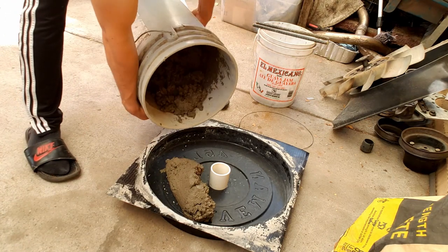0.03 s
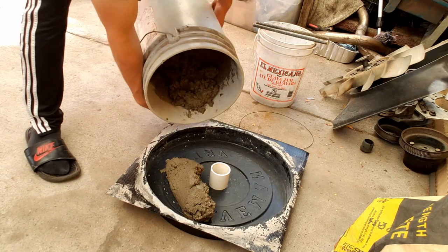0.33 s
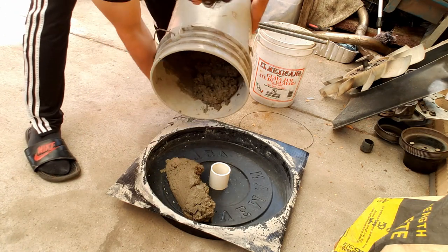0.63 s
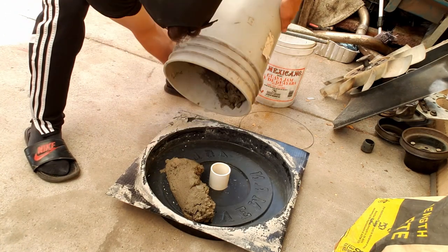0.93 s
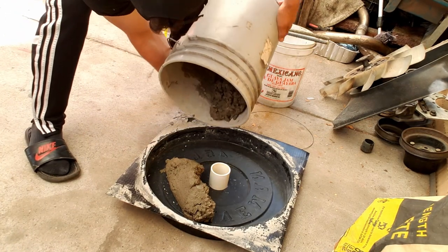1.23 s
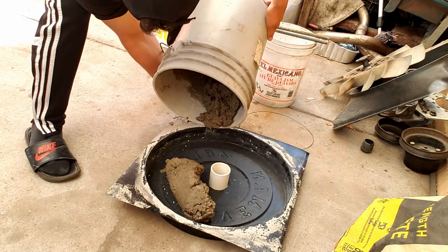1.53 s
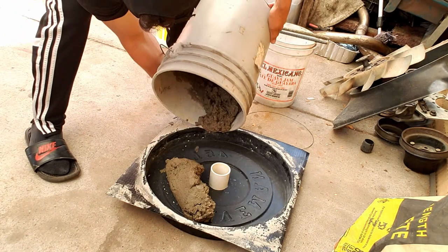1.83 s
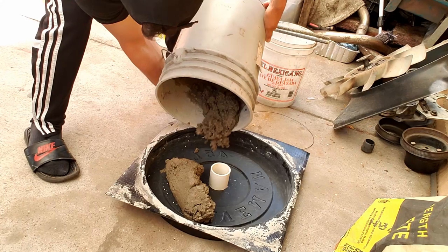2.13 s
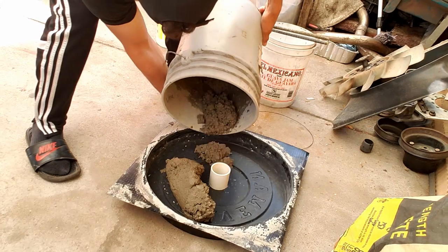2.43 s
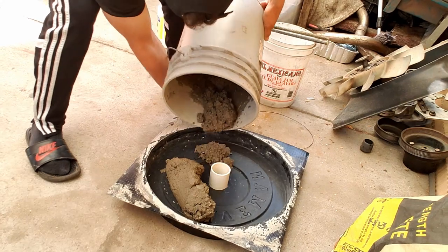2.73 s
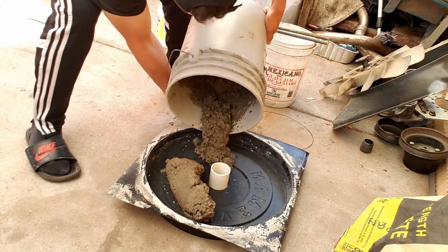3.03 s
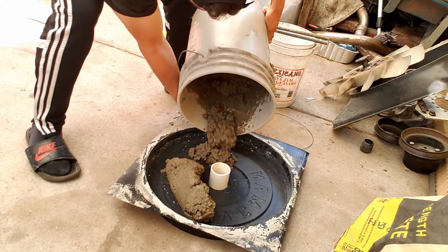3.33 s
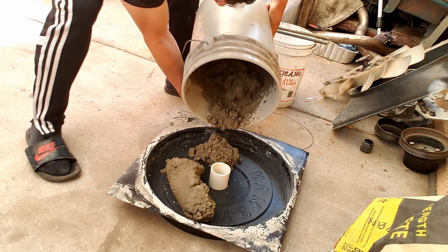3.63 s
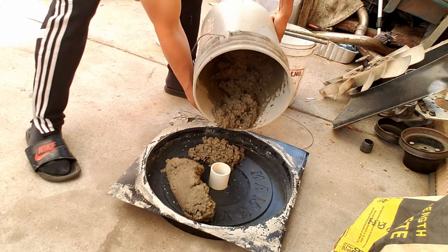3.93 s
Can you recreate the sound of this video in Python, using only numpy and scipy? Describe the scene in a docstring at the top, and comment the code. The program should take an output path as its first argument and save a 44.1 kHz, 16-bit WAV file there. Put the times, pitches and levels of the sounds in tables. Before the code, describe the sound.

Wet, gritty concrete slides from a plastic bucket and splats in clumps into a plastic mold.

```python
"""Gritty wet concrete is shaken out of a plastic bucket into a plastic mold on a hard floor.
The mix hisses along the bucket wall; clumps splat, squeeze out air pockets and crackle wetly.
Pebbles and grit tick, and twice the plastic takes a hard knock and rings.
A short room tail follows; puffs of air rumble on the microphone over a low background."""
import sys
import numpy as np
from scipy import signal
from scipy.fft import rfft, irfft
from scipy.io import wavfile
from scipy.ndimage import uniform_filter1d

SR = 44100
rng = np.random.default_rng(int(sys.argv[2]) if len(sys.argv) > 2 else 0)


def store_wav(level_fs):
    """Save 16-bit WAV to argv[1]."""
    pcm = np.round(np.clip(np.atleast_2d(level_fs), -1, 1) * 32767)
    wavfile.write(sys.argv[1], SR, pcm.T.astype(np.int16))


N = 176400
SIDES = np.array([[1], [-1]])  # left, right
# grit spray spectrum: (frequency [Hz], level [dB])
GRIT_SPECTRUM = [(1500, -58), (3000, -1), (4300, 1.5), (6500, -0.5), (10000, -5), (16000, -13.5)]


def slide(grains_per_s=14000, flutter_db=1.0, flutter_s=0.018):
    """Sand rubs along the bucket wall in surges, fluttering slightly."""
    # (time [s], level [dB])
    surges = [(0, -45.5), (.17, -61), (.33, -72), (.43, -79), (.48, -59.5), (.55, -64), (.63, -60.5),
              (.73, -63), (.85, -52.5), (.96, -49.5), (1.01, -43), (1.09, -54), (1.15, -68.5),
              (1.21, -67.5), (1.27, -47.5), (1.34, -43.5), (1.57, -42), (1.7, -49), (1.78, -56.5),
              (1.87, -62.5), (1.97, -44), (2.03, -40), (2.13, -43), (2.24, -40), (2.45, -42), (2.52, -45.5),
              (2.58, -56), (2.73, -67.5), (2.78, -52), (2.83, -39), (2.87, -43.5), (2.94, -57),
              (3.0, -46.5), (3.07, -43.5), (3.12, -50.5), (3.19, -43.5), (3.3, -49.5), (3.36, -53.5),
              (3.44, -46), (3.53, -53), (3.58, -48.5), (3.72, -42), (3.79, -35.5), (3.85, -42), (3.92, -49),
              (4.0, -41.5)]
    # (frequency [Hz], level [dB])
    spectrum = [(100, -43), (300, -14), (600, -8.5), (1000, -5.5), (1500, 3), (2200, -0.5), (3200, -0.5),
                (5000, -2.5), (8000, -5), (16000, -11.5)]
    level_db = over_time(surges) + flutter_db * wobble(flutter_s, N)
    hiss = colour(grains(N, grains_per_s, spread_db=2.5), spectrum)
    return from_db(level_db) * rms_one(hiss)


def clumps():
    """Each clump thuds on the mold, smacks wetly and scatters grit."""
    # (time [s], rise [s], decay [s], thud [dB], smack [dB], grit [dB])
    landings = [ (2.247, 0.00085, 0.012, -29.5, -26.5, -27.5), (2.268, 0.00067, 0.0067, -23.5, -31, -44),
                (2.2774, 0.0017, 0.01, -28.5, -21.5, -26), (2.291, 0.0017, 0.014, -25.5, -23.5, -29),
                (2.311, 0.00071, 0.0071, -29, -29, -46), (2.319, 0.0037, 0.0088, -17.5, -21.5, -25),
                (2.3294, 0.00031, 0.0021, -12, -14.5, -19), (2.342, .001, 0.0044, -26.5, -40, -41),
                (2.3745, 0.0058, 0.0045, -22, -26, -24.5), (2.429, 0.00055, 0.0025, -37, -29, -27.5),
                (2.4594, .001, 0.0043, -27, -31, -34), (2.477, 0.0056, 0.012, -32, -28.5, -29),
                (2.602, 0.003, 0.0034, -49.5, -41, -72), (2.957, 0.00033, 0.0044, -37, -34, -33),
                (3.013, 0.0057, .008, -38, -46, -41), (3.019, 0.0026, 0.003, -25.5, -26, -27.5),
                (3.045, 0.0033, 0.018, -43, -36.5, -55), (3.123, 0.0011, .004, -39, -39, -48),
                (3.141, 0.0011, 0.0034, -26, -25.5, -20), (3.161, 0.0025, .015, -40, -44, -42),
                (3.243, 0.00063, 0.0026, -34, -27, -34), (3.260, 0.00041, 0.0052, -30.5, -32.5, -50),
                (3.293, 0.0006, 0.0049, -33.5, -37.5, -33), (3.315, .002, 0.0068, -41.5, -40.5, -47),
                (3.377, 0.019, 0.012, -44, -30, -39), (3.419, 0.0037, 0.0027, -55, -33.5, -38),
                (3.443, 0.0017, 0.013, -52, -38.5, -43.5), (3.547, 0.0024, 0.011, -42, -39.5, -41),
                (3.586, 0.00084, 0.0022, -58, -48, -32.5), (3.603, 0.0024, 0.005, -33.5, -31.5, -53),
                (3.611, 0.00066, 0.0079, -38.5, -30, -56), (3.646, 0.0024, 0.014, -38.5, -37, -44),
                (3.688, 0.001, 0.014, -33.5, -34, -33.5), (3.738, 0.011, 0.007, -37.5, -24.5, -30),
                (3.762, 0.0013, 0.023, -39.5, -27.5, -39), (3.875, 0.0015, 0.0056, -26.5, -35, -50),
                (3.895, 0.0011, 0.0045, -29, -35, -47), (3.926, 0.0016, 0.0063, -27.5, -30, -27),
                (3.974, 0.00087, 0.0029, -41, -33, -37)]
    # (frequency [Hz], level [dB])
    thud_spectrum = [(60, -18.5), (200, -19.5), (360, -35.5), (550, -14), (850, -1.5), (1100, -4.5),
                     (1500, -4.5), (3000, -54.5)]
    # (frequency [Hz], level [dB])
    smack_spectrum = [(500, -18.5), (950, -19.5), (1400, -2), (2000, -2), (2800, -2.5), (4000, -9.5),
                      (6000, -16.5), (12000, -17)]
    out = np.zeros((2, N))
    for time_s, rise_s, decay_s, thud_db, smack_db, grit_db in landings:
        add(out, time_s, from_db(thud_db) * burst(rise_s, decay_s, thud_spectrum))
        add(out, time_s, from_db(smack_db) * burst(rise_s, decay_s, smack_spectrum))
        add(out, time_s, from_db(grit_db) * burst(rise_s, decay_s, GRIT_SPECTRUM))
    return out


def air_pockets(rise_s=0.00033, glide_per_s=2.4, size=4096):
    """Air squeezed from the landing mix rings for a few unsteady cycles, rising a little in pitch."""
    # (time [s], pitch [Hz], level [dB], decay [s])
    pops = [(2.279, 1205, -22.5, 0.0089), (2.292, 1167, -18.5, 0.0093), (2.322, 1810, -23, 0.0093),
            (2.376, 1403, -27, 0.0056), (2.4299, 1420, -30.5, 0.0032), (2.604, 2000, -43, .005),
            (3.020, 2565, -21.5, 0.0026), (3.143, 1550, -20, 0.003), (3.147, 400, -43, .016),
            (3.163, 675, -33.5, 0.0061), (3.243, 2127, -33.5, 0.0077), (3.261, 3400, -38, 0.0065),
            (3.293, 3380, -35.5, 0.0047), (3.316, 717, -38, 0.0067), (3.328, 574, -50, 0.0063),
            (3.384, 1593, -38, 0.018), (3.422, 1700, -32.5, 0.0042), (3.612, 910, -32.5, 0.0059),
            (3.648, 1265, -28, 0.0035), (3.742, 1533, -25, 0.0069), (3.928, 1414, -23, 0.0039)]
    out, t = np.zeros((2, N)), np.arange(size) / SR
    for time_s, hz, db, decay_s in pops:
        phase = 2 * np.pi * hz * (t + glide_per_s * t ** 2 / 2) + wobble(2 / hz, size)
        envelope = np.minimum(t / rise_s, 1) * np.exp(-t / decay_s)
        add(out, time_s, from_db(db) * np.sqrt(2) * envelope * np.sin(phase))
    return out


def crackle(snaps_per_s=420, spread_db=2, decay_cycles=3.2, pitches=24, size=1024):
    """Water films snap at random as the mix tears and settles, each ringing at its own pitch."""
    # (time [s], level [dB])
    levels = [(0, -89), (1.1, -84), (1.35, -58), (1.7, -60), (1.85, -70), (2.05, -61), (2.23, -51),
              (2.32, -39), (2.48, -48), (2.62, -69), (2.75, -77), (2.85, -51), (2.97, -71), (3.05, -44),
              (3.11, -62), (3.2, -58), (3.3, -49), (3.36, -58), (3.41, -43.5), (3.52, -58), (3.62, -44.5),
              (3.72, -42), (3.8, -44.5), (3.9, -42.5), (4.0, -50)]
    # (frequency [Hz], level [dB])
    spectrum = [(700, -7), (1500, -2.5), (3000, -5.5), (6500, -6)]
    t = np.arange(size) / SR
    pitch_index = rng.integers(0, pitches, N)
    onsets = rng.random(N) < snaps_per_s / SR
    snaps = onsets * from_db(spread_db * np.minimum(rng.exponential(1, N), 3.5))
    out = 0
    for k, hz in enumerate(np.geomspace(spectrum[0][0], spectrum[-1][0], pitches)):
        ring = rms_one(np.sin(2 * np.pi * hz * t) * np.exp(-t * hz / decay_cycles))
        out = out + from_db(at_hz(spectrum, hz)) * convolve(snaps * (pitch_index == k), ring)
    return from_db(over_time(levels)) * rms_one(out)


def knocks(low_cut_hz=480):
    """A gritty crack sets the plastic ringing; the thin wall flexes with a dull bump."""
    # (time [s], ring [dB], pitch [ratio], t60 [ratio], crack [dB], flex [dB], left-right [dB])
    strikes = [(1.9074, -16.5, 0.99, 0.75, -26, -35.5, 2.5), (1.9177, -28.5, 0.98, 1, -35, -36, -4),
               (3.8524, -14.5, 0.91, 0.49, -28, -49, 1)]
    # (frequency [Hz], level [dB], t60 [s])
    plastic_modes = [(653, -16, 0.062), (871, -0.5, 0.084), (979, -4, .12), (1026, -6.5, 0.068),
                     (1215, 2.5, 0.043), (1503, -4.5, 0.11), (1528, -2, 0.047), (2140, 7.5, 0.0077),
                     (2480, -7, 0.058), (2780, -4, 0.015)]
    # (frequency [Hz], level [dB])
    flex_spectrum = [(100, -16), (250, -6.5), (480, -4.5), (650, 0), (1000, -20), (3000, -50)]
    out, t = np.zeros((2, N)), np.arange(SR // 2) / SR
    low_cut = signal.butter(2, low_cut_hz, "high", fs=SR, output="sos")
    for time_s, ring_db, pitch_ratio, t60_ratio, crack_db, flex_db, pan_db in strikes:
        ring = np.zeros_like(t)
        for k, (hz, db, t60_s) in enumerate(plastic_modes):
            envelope = from_db(db - 60 * t / (t60_s * t60_ratio))
            ring += (-1) ** k * envelope * np.sin(2 * np.pi * hz * pitch_ratio * t)
        crack = burst(rise_s=0.00019, decay_s=0.0075, spectrum=GRIT_SPECTRUM)
        flex = burst(rise_s=0.001, decay_s=0.021, spectrum=flex_spectrum)
        add(out, time_s, panned_gain(ring_db, pan_db) * signal.sosfilt(low_cut, ring))
        add(out, time_s, from_db(crack_db) * crack + from_db(flex_db) * flex)
    return out


def pebbles(rise_s=0.00027):
    """Small stones tick against the inside of the bucket."""
    # (time [s], level [dB], decay [s])
    hits = [(.0082, -24, 0.0036), (.016, -43, 0.024), (0.555, -36.5, 0.0022), (0.595, -40, 0.0058),
            (0.627, -32.5, 0.0022), (0.651, -41, 0.0036), (1.005, -40, 0.0044), (1.084, -44, 0.0036),
            (1.685, -36, 0.006), (1.702, -39.5, 0.0029), (1.853, -47, 0.005), (2.062, -36, 0.0045)]
    # (frequency [Hz], level [dB])
    spectrum = [(300, -20), (900, -9), (1250, -5.5), (1560, 7.5), (1850, -3.5), (2300, -2), (3000, -8),
                (4000, -14.5), (6000, -16.5), (10000, -28.5), (16000, -25)]
    out = np.zeros((2, N))
    for time_s, db, decay_s in hits:
        add(out, time_s, from_db(db) * burst(rise_s, decay_s, spectrum))
    return out


def falling_grit(rise_s=0.0005, decay_s=0.0012):
    """Single grains land with short, bright ticks."""
    # (time [s], level [dB])
    ticks = [(.263, -50), (0.355, -53.5), (.498, -64), (.627, -64), (.682, -55), (2.428, -38), (3.072, -34),
             (3.294, -36), (3.841, -48), (3.926, -46), (3.974, -32)]
    # (frequency [Hz], level [dB])
    spectrum = [(1000, -25), (3000, -32), (6000, -5), (9000, 4), (16000, -4)]
    out = np.zeros((2, N))
    for time_s, db in ticks:
        add(out, time_s, from_db(db) * burst(rise_s, decay_s, spectrum))
    return out


def air_puffs():
    """Soft puffs of air rumble on the microphone."""
    # (time [s], Gaussian width [s], level [dB], left-right [dB])
    puffs = [(.04, 0.023, -45, 17), (0.628, 0.026, -33, 10), (.765, 0.0089, -27, -13),
             (1.038, 0.024, -32.5, 15.5), (1.209, 0.021, -31.5, 18.5), (1.841, 0.058, -33, 0.5),
             (2.1, 0.017, -34, 3.5), (3.05, 0.034, -39, 6)]
    # (frequency [Hz], level [dB])
    spectrum = [(15, -46), (35, -5.5), (58, 1.5), (95, -6), (150, -19), (300, -46.5), (1000, -70)]
    out, t = np.zeros((2, N)), np.arange(N) / SR
    rumble = colour(rng.standard_normal((2, N)), spectrum)
    for time_s, width_s, db, pan_db in puffs:
        swell = np.exp(-.5 * ((t - time_s) / width_s) ** 2)
        out += panned_gain(db, pan_db) * rms_one(rumble * swell) * np.sqrt(np.mean(swell ** 2))
    return out


def ambience(base_db=-44):
    """Low background noise, easing slightly in the second half."""
    # (frequency [Hz], level [dB])
    spectrum = [(15, -33), (25, -32), (38, -1.5), (60, 4.5), (100, -3), (160, -14.5), (250, -20),
                (400, -27.5), (800, -28), (1200, -30), (1800, -43), (3000, -71), (5000, -49), (8000, -50),
                (16000, -63)]
    # (time [s], gain [dB])
    drift = [(0, 1), (1.8, 1), (2.6, -1.5), (4, -2)]
    noise = colour(stereo(rng.standard_normal((2, N))), spectrum)
    return panned_gain(base_db + over_time(drift), pan_db=1) * rms_one(noise)


def room(x, early_db=-6, tail_db=-17, first_echo_s=0.0061, early_decay_s=0.016, size=32768):
    """Close echoes from floor and bucket, then a diffuse tail that dies sooner in the treble."""
    # (frequency [Hz], t60 [s])
    reverb_times = [(300, 0.23), (1000, 0.31), (3000, 0.2), (8000, 0.17), (16000, 0.083)]
    t = np.arange(size) / SR
    early_fade = np.exp(-np.maximum(t - first_echo_s, 0) / early_decay_s)
    echoes = rng.standard_normal((2, size)) * (rng.random((2, size)) < .03)
    early = echoes * (t > first_echo_s) * early_fade
    white = rfft(rng.standard_normal((2, size)))
    hz = np.linspace(0, SR / 2, size // 2 + 1)
    edges_hz = [0, 700, 1400, 2800, 5600, 11000, SR]
    tail = np.zeros((2, size))
    for low, high in zip(edges_hz, edges_hz[1:]):
        band = irfft(white * (hz >= low) * (hz < high))
        tail += band * from_db(-60 * t / at_hz(reverb_times, (low + high) / 2))
    tail *= 1 - early_fade
    response = from_db(early_db) * rms_one(early) + from_db(tail_db) * rms_one(tail)
    return convolve(x, response / np.sqrt(size))


def burst(rise_s, decay_s, spectrum, size=6144):
    """A shower of grains swells and dies away; about unit rms at its top."""
    t = np.arange(size) / SR
    envelope = np.minimum(t / rise_s, 1) * np.exp(-np.maximum(t - rise_s, 0) / decay_s)
    shower = colour(grains(size, per_s=5500, spread_db=3.5) * envelope, spectrum)
    return rms_one(shower) * np.sqrt(np.mean(envelope ** 2))


def grains(size, per_s, spread_db):
    """Random sand-grain clicks of uneven strength, in stereo."""
    strength = from_db(spread_db * np.minimum(rng.exponential(1, (2, size)), 4))
    polarity = rng.choice([-1, 1], (2, size))
    onsets = rng.random((2, size)) < per_s / SR
    return stereo(strength * polarity * onsets)


def stereo(pair):
    """Two unrelated signals become left and right, most alike in the low mids."""
    # (frequency [Hz], left-right correlation [ratio])
    likeness = [(30, 0), (100, 0.48), (250, 0.9), (800, 0.52), (1700, 0.22), (3500, 0.26), (6500, 0),
                (16000, 0)]
    size = pair.shape[-1]
    mid, side = rfft(pair)
    alike = at_hz(likeness, np.arange(len(mid)) * SR / size)
    return irfft(np.sqrt(1 + alike) * mid + SIDES * np.sqrt(1 - alike) * side, size)


def colour(x, curve, size=4096):
    """Minimum-phase filter from a (frequency [Hz], gain [dB]) curve."""
    gain = from_db(at_hz(curve, np.linspace(0, SR / 2, size // 2 + 1)))
    cepstrum = irfft(np.log(gain))
    cepstrum[1:size // 2] *= 2
    cepstrum[size // 2 + 1:] = 0
    return convolve(x, irfft(np.exp(rfft(cepstrum))))


def wobble(smooth_s, size):
    """Smooth random motion of unit rms."""
    width = max(int(smooth_s * SR), 2)
    return rms_one(uniform_filter1d(uniform_filter1d(rng.standard_normal(size), width), width))


def add(out, time_s, sound):
    """Mix a sound in at a time."""
    start = int(time_s * SR)
    out[:, start:start + sound.shape[-1]] += sound[..., :N - start]


def convolve(x, response):
    """Convolve, keeping the length."""
    return signal.fftconvolve(np.atleast_2d(x), np.atleast_2d(response), axes=-1)[:, :x.shape[-1]]


def at_hz(curve, hz):
    """Read a curve on a log-frequency axis."""
    knots_hz, values = np.transpose(curve)
    return np.interp(np.log(np.maximum(hz, 1)), np.log(knots_hz), values)


def over_time(curve):
    """Read a time curve at every sample."""
    return np.interp(np.arange(N) / SR, *np.transpose(curve))


def panned_gain(db, pan_db):
    """Left and right gains, pan_db apart."""
    return from_db(db + SIDES * pan_db / 2)


def from_db(db):
    """Decibels to gain."""
    return 10 ** (np.asarray(db) / 20)


def rms_one(x):
    """Scale to unit rms."""
    return x / np.sqrt(np.mean(x ** 2) + 1e-20)


def scene():
    """The pour, its room and the air around the microphone."""
    hiss_send_db = -12.5
    hiss = slide()
    hits = clumps() + air_pockets() + crackle() + knocks() + pebbles() + falling_grit()
    reverb = room(hits + from_db(hiss_send_db) * hiss)
    return hiss + hits + reverb + ambience() + air_puffs()


def record(dry):
    """The microphone has a treble dip and a brighter left side; the top is cut."""
    # (frequency [Hz], left-right [dB])
    balance = [(100, -0.5), (800, 1), (1700, 0), (3500, 3.5), (7000, 3), (14000, 3.5)]
    # (frequency [Hz], gain [dB])
    mic_response = [(100, 1.5), (6000, 2), (7200, 2), (8300, -5.5), (9300, -4.5), (11000, 1.5),
                    (15500, 7.5)]
    cutoff_hz = 15900
    left = colour(dry[0], [(hz, db / 2) for hz, db in balance])
    right = colour(dry[1], [(hz, -db / 2) for hz, db in balance])
    high_cut = signal.ellip(12, .2, 80, cutoff_hz, fs=SR, output="sos")
    return signal.sosfilt(high_cut, colour(np.vstack([left, right]), mic_response))


dry = scene()
out = record(dry)
store_wav(out)
```